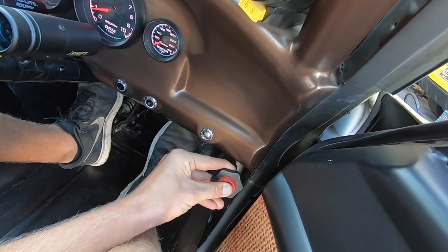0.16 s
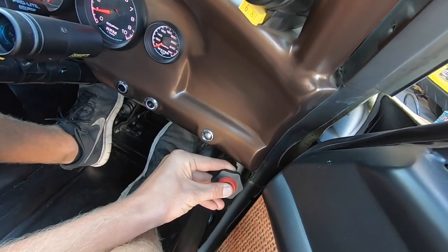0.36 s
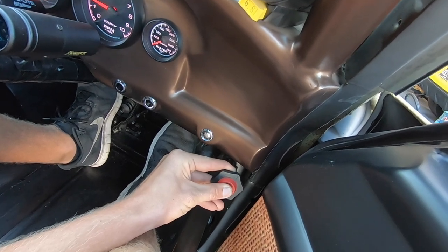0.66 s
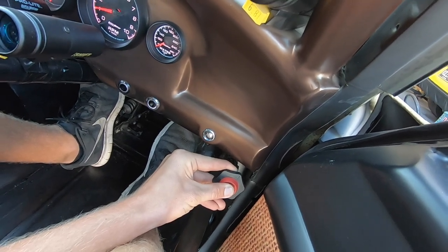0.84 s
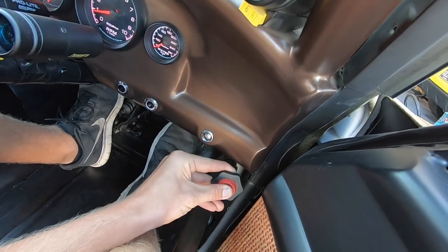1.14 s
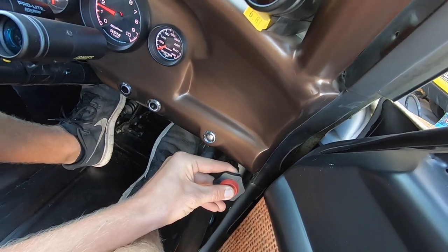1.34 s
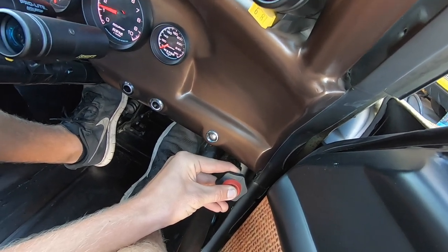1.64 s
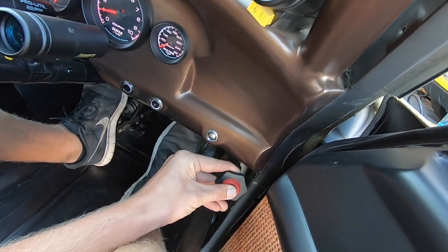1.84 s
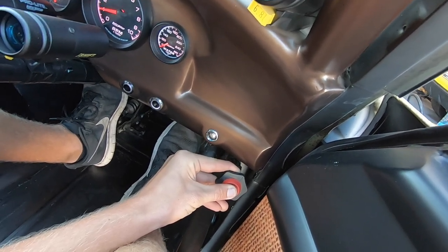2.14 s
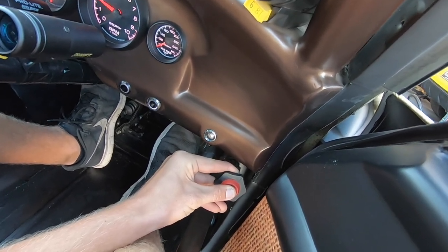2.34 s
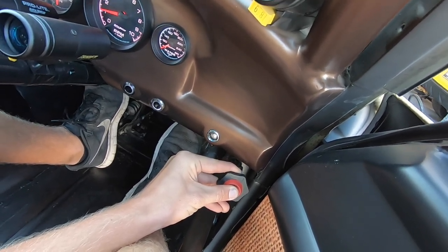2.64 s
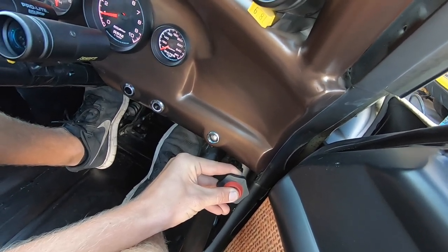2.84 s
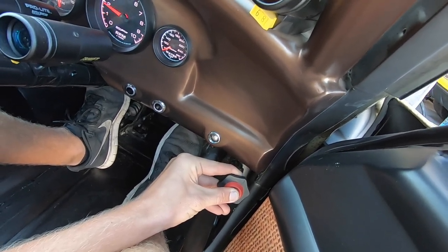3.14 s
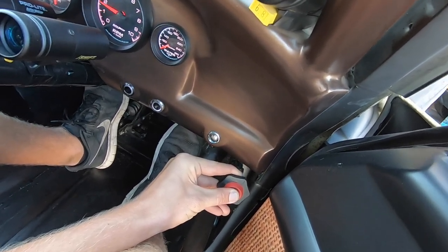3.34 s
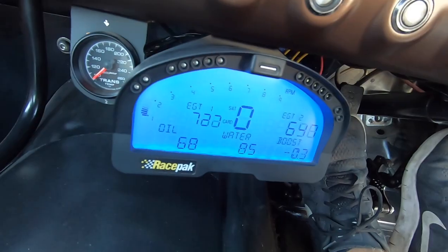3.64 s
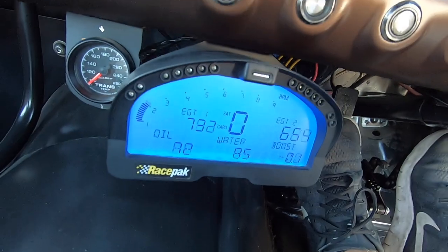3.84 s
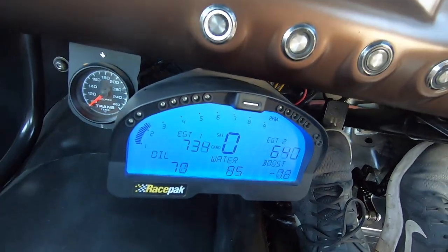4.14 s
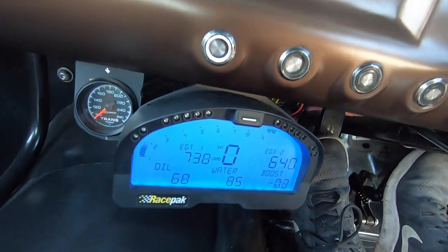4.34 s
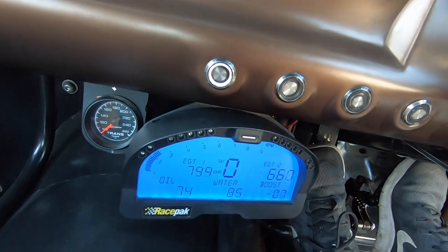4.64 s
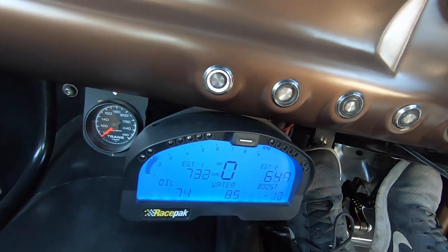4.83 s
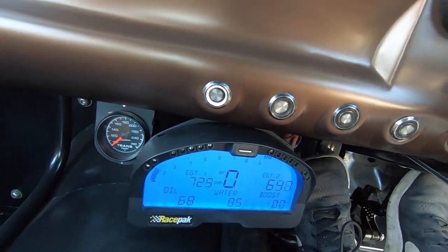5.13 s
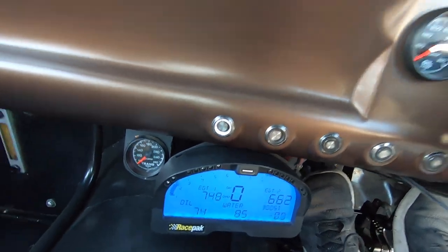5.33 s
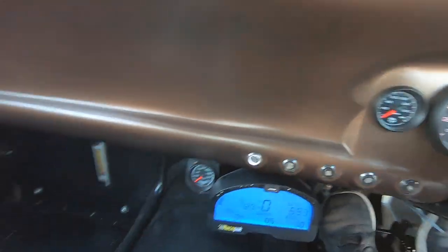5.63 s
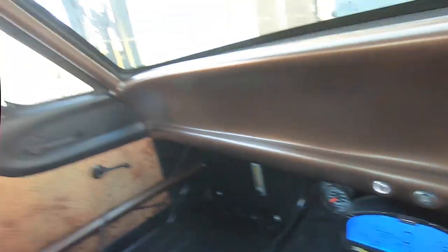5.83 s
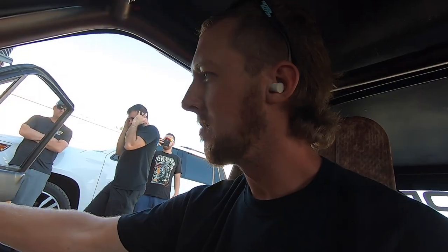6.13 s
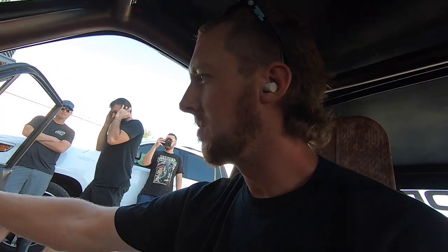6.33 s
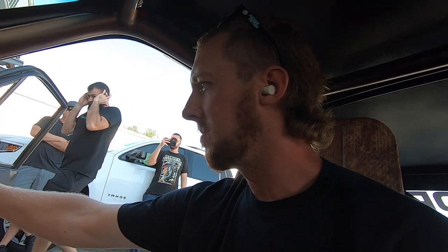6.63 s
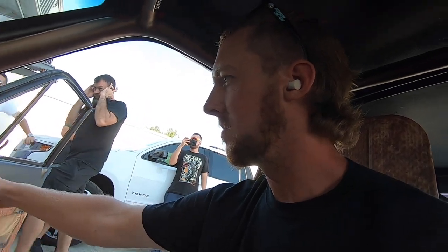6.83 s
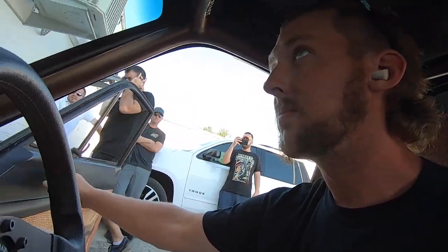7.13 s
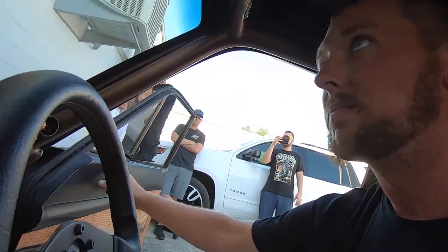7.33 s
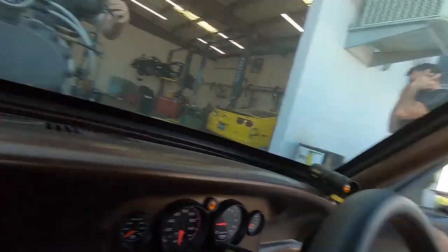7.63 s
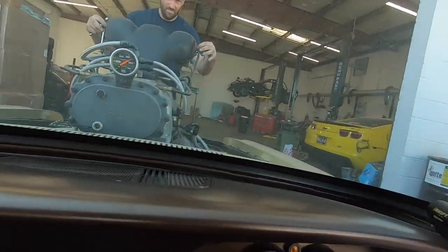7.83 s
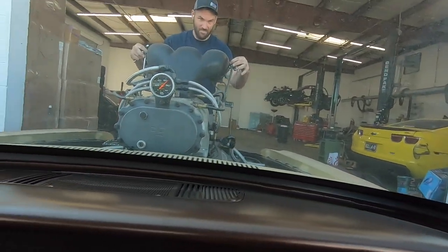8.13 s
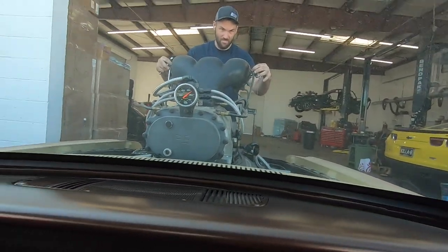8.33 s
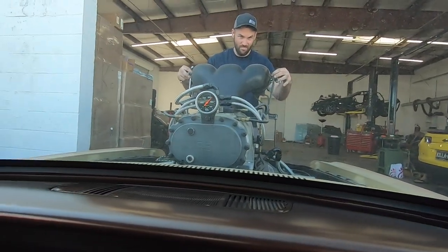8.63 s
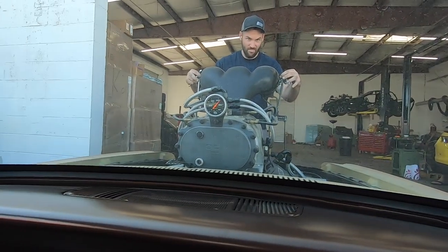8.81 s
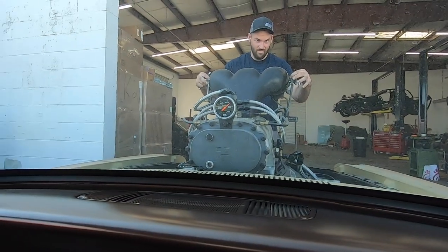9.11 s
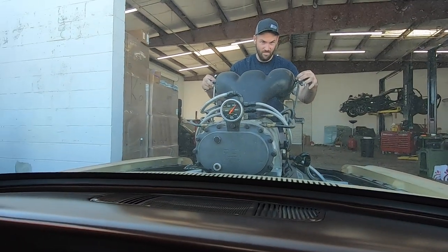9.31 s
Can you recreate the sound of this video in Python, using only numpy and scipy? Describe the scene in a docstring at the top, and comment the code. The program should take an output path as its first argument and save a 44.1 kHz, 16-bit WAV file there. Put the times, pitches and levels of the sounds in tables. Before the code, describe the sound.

Loud rhythmic hunting of a big racing engine, recorded in its hard, dry cabin. Each surge rises in about a fifth of a second, roars with raspy exhaust, and falls back into uneven firing and pops. Early surges are widely spaced and sweep far; later ones come faster and more evenly. Low boom and body rumble continue underneath as the listening place shifts from footwell to dashboard to window side.

```python
"""A big supercharged eight-cylinder engine hunts at idle, heard inside the bare cabin of its car.
Surges lift the firing note (sine and octave), bark from the pipes (pulsed resonances) and ring the cabin.
Now and then, in surges and between them, the bass drops out briefly; cylinders catch with pops and the
cabin booms near 90 Hz. Gas blasts are puffed noise bands with ringing metal; body rumble and valve hiss
are filtered noise. The listening place passes from footwell to dashboard to window."""
import sys
import numpy as np
from scipy import signal
from scipy.fft import rfft, irfft, next_fast_len
from scipy.io import wavfile
from scipy.ndimage import uniform_filter1d

SR = 44100
rng = np.random.default_rng(int(sys.argv[2]) if len(sys.argv) > 2 else 0)


def wav_out(sig):
    """Save sig, one row per channel (or a flat mono array), as 16-bit PCM at SR to the path in sys.argv[1]."""
    wavfile.write(sys.argv[1], SR, np.round(np.clip(np.atleast_2d(sig).T, -1, 1) * 32767).astype(np.int16))


N = 417627
STEP = 64   # samples between control values
BOOM_HZ, BOOM_WIDTH_HZ = 91.15, 8.65   # lowest cabin mode


def from_db(db):
    """Amplitude factor from dB."""
    return 10 ** (np.asarray(db) / 20)


def rms_one(x):
    """Scales the whole array to rms 1."""
    return x / np.sqrt(np.mean(x ** 2) + 1e-20)


def at_hz(points, hz):
    """Second column read off at hz, on a log frequency axis."""
    points_hz, values = np.transpose(points)
    return np.interp(np.log(hz), np.log(np.maximum(points_hz, 1)), values)


def smooth(x, hz):
    """One-pole low-pass; hz holds for signals at SR."""
    r = np.exp(-2 * np.pi * hz / SR)
    return signal.lfilter([1 - r], [1, -r], x)


def band_pass(x, order, low_hz, high_hz):
    """Butterworth band-pass."""
    return signal.sosfilt(signal.butter(order, [low_hz, high_hz], "band", fs=SR, output="sos"), x)


def resonance(x, hz, width_hz):
    """Two-pole peak with gain 1 on top."""
    r = np.exp(-np.pi * width_hz / SR)
    poles = [1, -2 * r * np.cos(2 * np.pi * hz / SR), r * r]
    return signal.lfilter([(1 - r * r) / 2, 0, (r * r - 1) / 2], poles, x)


def double_resonance(x, hz, width_hz):
    """A peak followed by one twice as wide."""
    return resonance(resonance(x, hz, width_hz), hz, 2 * width_hz)


def evened(x, window_s, share):
    """Divides out a share of the slow level, leaving rms 1."""
    power = uniform_filter1d(x ** 2, int(window_s * SR), axis=-1) + 1e-3 * np.mean(x ** 2)
    return rms_one(x / power ** (np.clip(share, 0, 1) / 2))


def control_times():
    """Times of the control values, s."""
    return np.arange(0, N + STEP, STEP) / SR


def filled(values):
    """Control values drawn out to every sample."""
    return np.interp(np.arange(N) / STEP, np.arange(len(values)), values)


# listening place: t/s, place (0 footwell, 1 dashboard, 2 window)
PLACE = [(0, 0), (3.3, 0), (3.7, 1), (5.8, 1), (6.2, 2), (9.47, 2)]


def by_place(values):
    """Values for footwell, dashboard and window, blended as the listening place moves."""
    place = np.interp(control_times(), *np.transpose(PLACE))
    return filled(np.interp(place, np.arange(3), values))


# crank surges: start t/s, climb/s, low rate/(firings/s), top rate/(firings/s), bark on top/dB
SURGES = [(0.26, 0.19, 58.4, 143.5, 2), (1.15, 0.19, 59.2, 148, 3.5), (2.02, .21, 65.5, 141, 3.5),
          (2.92, 0.21, 58.5, 153.5, 3.5), (3.52, .22, 71.7, 128, 1.5), (4.19, 0.23, 78, 132, 2.5),
          (4.93, .2, 81.7, 110, 0.5), (5.6, 0.24, 81.7, 132, 1), (6.201, .25, 84, 123, 2.5),
          (6.831, .23, 86, 125, 2.5), (7.42, .26, 86, 126.7, 3.5), (8.06, .26, 89, 121.4, 2.5),
          (8.7, 0.23, 89, 121, 1.5), (9.301, .3, 88.7, 115, 4.5)]
# idle hunting: t/s, rate loss after a top/(firings/s per s), power of climb time share, climb note gain/dB
SAG = [(0, 205, 1.195, 9.5), (3, 201.6, 1.2, 6.5), (4.5, 223, 1.477, 2.5), (6.5, 170, 2.0, 6),
       (9.47, 158.7, 2.04, -1.5)]


def surging():
    """Firing rate climbs to each top and sags to the next low; note level shifts on the climb, pipes bark on top."""
    flywheel_s, bark_s = .05, .06   # moving average; bark half length to 1/e of its dB
    t = control_times()
    start, climb, low, high, bark_db = np.transpose(SURGES)
    sag_t, *sag_columns = np.transpose(SAG)
    sag, bend, climb_db = (np.interp(t, sag_t, column) for column in sag_columns)
    last, top = len(start) - 1, start + climb
    k = np.clip(np.searchsorted(start, t) - 1, 0, last)
    up = np.clip((t - start[k]) / climb[k], 0, 1)
    climbing = low[k] + (high[k] - low[k]) * up ** bend
    sagging = np.maximum(high[k] - sag * (t - top[k]), low[np.minimum(k + 1, last)])
    per_s = np.where(up < 1, climbing, sagging)
    climb_db = climb_db * (up > 0) * (up < 1)
    rounded = [uniform_filter1d(c, int(flywheel_s * SR / STEP)) for c in (per_s, climb_db)]
    bark_db = sum(db * np.exp(-((t - s) / bark_s) ** 2) for s, db in zip(top, bark_db))
    return [filled(c) for c in (*rounded, bark_db)]


# cylinder strength in firing order, before chance: relative level/dB
CYLINDER_DB = [-4.5, 0.5, -5, -1, -6, -4.5, -1, -7.5]


def firings(cycles, uneven_db, jitter):
    """One click per firing; strength by cylinder and chance, timing off by jitter (share of a firing)."""
    count = np.arange(1, 1200)
    chance = rng.standard_normal((len(count), 2))
    at = np.searchsorted(cycles, count + jitter * chance[:, 0])
    size = from_db(np.array(CYLINDER_DB)[count % 8] + uneven_db * chance[:, 1])
    clicks = np.full(N + 1, 1e-18)
    np.add.at(clicks, at, size)
    return clicks[:N]


# note before the lows are evened, loudest near 78 firings/s, weakest near 120: rate/(firings/s),
# relative level/dB
NOTE = [(55, -25), (66, -21), (78, -11), (90, -16.5), (105, -14), (120, -27.5), (150, -15)]


def note_level(per_s, load_db, climb_db):
    """Note level follows firing rate, a share of the gas load, and the climb; dB."""
    return at_hz(NOTE, per_s) + 0.19 * load_db + climb_db


def firing_note(cycles, clicks, note_db, growl_db):
    """Firing order swells with the strength of each cylinder; its octave comes out under load."""
    swell = smooth(smooth(clicks, 16.0), 16.0) / uniform_filter1d(clicks, SR // 5)
    lumps = rms_one(np.clip(swell, .4, 1.7)) ** 0.52
    phase = 2 * np.pi * cycles
    first = from_db(note_db) * np.sin(phase)
    octave = from_db(growl_db - 11.5) * np.sin(2 * phase)
    return np.sqrt(2) * lumps * (first + octave)


def boom(clicks, per_s, boom_db):
    """Firings and noise ring the lowest cabin mode; it yields as the firing note passes its pitch."""
    push = rms_one(clicks) + 1.15 * rng.standard_normal(N)
    ringing = double_resonance(push, BOOM_HZ, BOOM_WIDTH_HZ)
    free = 1 - 0.22 * np.exp(-((per_s - BOOM_HZ) / 9.6) ** 2)
    return from_db(boom_db) * free * evened(ringing, .045, share=0.82)


# bass before load and dips, strongest near the cabin pitch: rate/(firings/s), level/dB
BASS = [(58, -15.5), (75, -15), (90, -11.5), (105, -13), (120, -17), (150, -16.5)]


def bass(lows, per_s, load_db):
    """Evens note and boom together, then sets their level by rate, gas load and dips."""
    level_db = at_hz(BASS, per_s) + 0.036 * load_db
    lows = from_db(level_db) * dips() * evened(lows, .03, share=0.93)
    return lows * from_db([[-.15], [.15]])


# body shake: level/dB of the low band in footwell, at dashboard, at window
RUMBLE_DB = [-32.5, -36.5, -34.5]


def rumble():
    """Shaking body: noise below and above the boom, a trace of it unlike on the two sides."""
    below, above = rng.standard_normal((2, 2, N))
    noise = rms_one(band_pass(below, 2, 22, 70))
    noise += from_db(2.0) * rms_one(band_pass(above, 2, 105, 175))
    return from_db(by_place(RUMBLE_DB)) * (noise[0] + from_db(-16) * noise[1] * [[1], [-1]])


def growl_level(per_s, gas_load_db, bark_db):
    """Growl follows gas load, firing rate and bark, over an idle floor; dB."""
    growl_db = -24.5 + 0.64 * gas_load_db + 6 * np.log2(per_s / BOOM_HZ) + bark_db   # 6 dB/octave
    idle_db = -41.5
    return 10 * np.log10(from_db(2 * growl_db) + from_db(2 * idle_db))


def cabin(x, t60_s):
    """Short feedback delays between hard panels, other ones on each side; rms 1."""
    size = next_fast_len(N + SR)
    w, spectrum = 2 * np.pi * np.arange(size // 2 + 1) / size, rfft(x, size)
    sides = []
    for lags in rng.uniform(.003, .016, (2, 6)) * SR:
        turns = [from_db(-60 * lag / SR / t60_s) * np.exp(-1j * w * lag) for lag in lags]
        sides.append(sum(z / (1 - z) * (-1) ** k for k, z in enumerate(turns)))
    return rms_one(irfft(spectrum * np.array(sides), size)[:, :N])


# pipe and cabin resonances: f/Hz, width of narrower peak/Hz, relative level/dB in footwell, at dashboard,
# at window
PIPES = [(37.4, 13, -17.5, -16, -6), (125, 20.4, 5.5, -3.5, 0.5), (156, 15.5, 4, 2.5, 6),
         (214.9, 20.4, -2, 2.5, 6), (245.3, 37.6, 1, -6.5, 0.5), (322, 35, -7.5, -7.5, -7),
         (374.7, 18.6, -8.5, -6.5, -13.5), (414.6, 32.6, -10, -12, -4.5), (483.5, 45, -15, -10, -8),
         (596, 55, -11.5, -14.5, -14), (781, 156, -9.5, -15.5, -12.5)]


def growl(clicks, growl_db):
    """Pressure pulses and turbulent wake ring the pipes; only the upper part spreads across the cabin."""
    wake = smooth(clicks, 32.0) * rng.standard_normal(N)
    push = rms_one(clicks) + 1.83 * rms_one(wake)
    rings = 0
    for k, (hz, width_hz, *db) in enumerate(PIPES):
        rings = rings + from_db(by_place(db)) * (-1) ** k * rms_one(double_resonance(push, hz, width_hz))
    rings = from_db(growl_db) * evened(rings, .1, share=0.83)
    upper = signal.sosfilt(signal.butter(7, 430, "high", fs=SR, output="sos"), rings)
    spread = from_db(-17) * np.std(rings) * cabin(upper, t60_s=.2)
    return rings + spread * from_db([[-1.5], [1.5]])


# headers and sheet metal: f/Hz, width/Hz, relative level/dB before chance
METAL = [(704, 55, 5), (768, 64, 3), (911, 43, 2.5), (1119, 36, -1), (1402, 280, 0), (1627, 33, -5.5),
         (1969, 50, -5.5), (2384, 130, -4.5), (2586, 80, -9.5), (3000, 140, -5.5), (3250, 90, -8),
         (3846, 29, -14.5), (6750, 92, -34), (7510, 40, -9)]


def rasp(clicks):
    """Each firing shakes every metal mode with a strength of its own; rms 1 overall."""
    at, out = np.flatnonzero(clicks > 1e-9), np.zeros((2, N))
    for hz, width_hz, db in METAL:
        blows = np.full(N, 1e-18)
        blows[at] = clicks[at] * from_db(5.4 * rng.standard_normal(1200)[:len(at)])
        shake = smooth(blows, 11.2) * rng.standard_normal(N)
        lean_db = 5.1 * rng.standard_normal() * np.array([[.5], [-.5]])
        out += from_db(db + lean_db) * rms_one(resonance(shake, hz, width_hz))
    return evened(out, 0.048, share=0.29)


# exhaust jet colour: f/Hz, relative level per Hz/dB in footwell, at dashboard, at window
JET = [(400, 0.5, -9.5, -5), (560, -10.5, -3, -6), (744, -4.5, -6.5, -15.5), (944, -10.5, -4, -6.5),
       (1590, -15, -7, -10), (2410, -12.5, -13.5, -16), (3100, -16.5, -16.5, -20), (4020, -22, -21.5, -23),
       (4890, -24.5, -24, -25), (7580, -15.5, -15.5, -17.5), (10050, -31, -27.5, -28.5),
       (11300, -47, -48, -46), (13000, -54, -58, -52), (15000, -57, -53.5, -57)]
# left-right likeness of the jet: f/Hz, correlation
LIKENESS = [(60, 1.0), (140, 0.96), (340, 1), (790, -0.046), (1880, 0.28), (4440, 0.6), (10500, -0.51)]
# left over right of the jet: f/Hz, level/dB
LEFT_OVER_RIGHT = [(60, 0.0), (170, 10), (470, -4), (1330, -1), (3730, -1), (10500, -1.5)]


def jet(clicks, jet_db, pop_power):
    """Gas tearing out of the pipes: third-octave noise puffed by every firing, brighter when weak."""
    puffs = rms_one(16.0 + rms_one(smooth(smooth(clicks, 36.0), 300.0)))
    level = np.sqrt((from_db(jet_db) * puffs) ** 2 + pop_power)
    effort_db = jet_db - np.mean(jet_db)
    out, edges_hz = 0, 450 * 2 ** np.arange(0, 5.4, 1 / 3)
    white = rng.standard_normal((2, 2, N))
    for k, (low_hz, high_hz) in enumerate(zip(edges_hz, edges_hz[1:])):
        mid, side = band_pass(white[k % 2], 3, low_hz, high_hz)
        hz = np.sqrt(low_hz * high_hz)
        alike = np.clip(at_hz(LIKENESS, hz), -1, 1)
        # one value per 64 samples, so the low-pass acts at 420 / 64 Hz
        flicker = np.repeat(rms_one(smooth(rng.standard_normal(N // 64 + 1), 420.0)), 64)[:N]
        tilt_db = -.05 * effort_db * np.log2(hz / 3000)
        colour_db = by_place([at_hz(np.array(JET)[:, [0, place]], hz) for place in (1, 2, 3)])
        lean = from_db(at_hz(LEFT_OVER_RIGHT, hz) * np.array([[.5], [-.5]]))
        band = np.sqrt(1 + alike) * mid + np.sqrt(1 - alike) * side * [[1], [-1]]
        out = out + from_db(colour_db + tilt_db + 2.35 * flicker) * lean * band
    metal = from_db(by_place([-1.5, -5, -5.5])) * rasp(clicks)
    return level * (rms_one(out) + metal)


def valve_gear():
    """Steady mechanical hiss from valves and blower that stays when the jet drops."""
    return from_db(-53.5) * rms_one(band_pass(rng.standard_normal((2, N)), 2, 900, 3400))


# cylinders that catch with a pop: t/s, relative level/dB, decay t60/s
POPS = [(0.035, -22, 0.11), (0.1188, -26.5, 0.24), (0.142, -20.5, 0.21), (0.2475, -22, 0.4),
        (0.8804, -27, 0.19), (0.944, -27, 0.31), (1.0796, -20.5, 0.066), (1.2206, -20.5, 0.17),
        (1.73, -25, 0.25), (1.805, -27, 0.34), (1.902, -22, 0.21), (1.9774, -20, 0.084), (2.016, -18, 0.2),
        (2.3223, -25, 0.17), (2.503, -33, 0.15), (2.566, -26.5, 0.19), (2.647, -23.5, 0.19),
        (2.7586, -23.5, 0.23), (2.842, -26, 0.57), (2.9374, -23, 0.19), (3.1515, -31.5, 0.14),
        (3.449, -41, 0.092), (3.519, -29, 0.15), (3.593, -27.5, 0.24), (3.883, -28, 0.16),
        (3.94, -25.5, 0.19), (4.005, -30, 0.24), (4.135, -27, 0.084), (4.679, -39, 0.12),
        (4.78, -26.5, 0.092), (5.3384, -28, 0.19), (5.385, -31.5, 0.2), (5.509, -29, 0.21),
        (5.601, -29, 0.21), (5.851, -23.5, 0.087), (6.0486, -26.5, 0.16), (6.125, -26, 0.094),
        (6.2454, -23.5, 0.2), (6.6996, -26, 0.17), (6.815, -27, 0.13), (6.8997, -20.5, 0.14),
        (6.975, -25, 0.14), (7.2, -26.5, 0.33), (7.269, -24.5, 0.076), (7.333, -31.5, 0.13),
        (7.372, -24.5, 0.13), (7.8186, -25, 0.09), (7.8705, -25, 0.095), (7.925, -26, 0.45),
        (8.105, -28.5, 0.56), (8.255, -22.5, 0.11), (8.466, -33, 0.21), (8.5197, -23.5, 0.29),
        (8.5804, -24, 0.11), (8.64, -31, 0.19), (8.706, -25.5, 0.15), (8.7505, -30.5, 0.23),
        (9.012, -24, 0.32), (9.072, -28.5, 0.37), (9.131, -23, 0.17), (9.25, -28, 0.32)]


def pops():
    """Each pop swells in a few ms, then falls ever faster as the gas escapes; power envelope."""
    out = np.zeros(N)
    for s, db, t60_s in POPS:
        at = round(s * SR)
        t = np.arange(min(N - at, SR // 4)) / SR
        fall_db = 60 * (t / max(t60_s, .03)) ** 1.4
        swell = 1 - np.exp(-t * SR / 170)   # 170 samples
        out[at:at + len(t)] += (from_db(db - 6 - fall_db) * swell) ** 2
    return out


# brief bass dips and a few lifts: t/s, depth/dB (negative lifts), length between 1/e points of the depth/s
BASS_DIPS = [(0.072, 10, 0.044), (0.226, 8, 0.034), (0.463, 1, 0.025), (0.565, 3, 0.12),
             (0.699, 12.5, 0.036), (1.049, 8, 0.019), (1.41, -1.5, 0.019), (1.61, 8.9, 0.045),
             (1.691, 17.5, 0.038), (1.869, 6, 0.0079), (1.977, 5, 0.024), (2.314, 2.5, 0.02),
             (2.373, 6, 0.029), (2.581, 30, 0.023), (2.784, 9.3, 0.019), (2.897, 9, 0.037),
             (3.133, 22, 0.011), (3.254, -1, 0.035), (3.424, 14, 0.031), (3.534, 11, 0.069),
             (3.783, 6, 0.013), (3.997, 10.5, 0.024), (4.198, 22, 0.026), (4.548, 9, 0.056),
             (4.697, 20, 0.019), (4.98, 4, 0.032), (5.04, -1, 0.015), (5.194, 4, 0.043), (5.59, 6.5, 0.069),
             (5.928, 22, 0.045), (6.132, 14, 0.0096), (6.239, 9, 0.046), (6.428, 23, 0.01),
             (6.824, 7.5, 0.018), (7.142, 14, 0.025), (7.371, 17, 0.023), (7.459, 10, 0.034),
             (7.737, 4, 0.048), (8.099, 9, 0.033), (8.235, 13, 0.03), (8.454, 22, 0.02), (8.66, 12, 0.043),
             (8.88, 8.5, 0.016), (8.938, 3, 0.012), (9.115, 4.5, 0.13), (9.245, 13.5, 0.019),
             (9.35, 25, 0.036)]


def dips():
    """Gain with a short rounded dip, or now and then a slight lift, of the bass."""
    t = control_times()
    depth_db = sum(db * np.exp(-(2 * (t - s) / length) ** 2) for s, db, length in BASS_DIPS)
    return from_db(-filled(depth_db))


# gas blasts from the pipe ends, one a surge: t/s, build/s, hold/s, start level/dB, full level/dB
BLASTS = [(0.258, 0.075, 0.16, -30.5, -23.5), (1.081, .15, .14, -34.5, -24.5), (1.935, 0.16, .14, -47, -24),
          (2.833, 0.16, 0.17, -48.5, -24.5), (3.468, 0.19, 0.095, -45, -26.5),
          (4.124, .2, .14, -45.5, -27.5), (4.69, .35, 0.11, -48.5, -26), (5.586, .18, 0.11, -41, -26),
          (6.038, 0.3, .27, -44, -26.5), (6.7, 0.32, 0.12, -38, -27.5), (7.292, 0.27, 0.18, -43, -26.5),
          (7.802, 0.44, .12, -44, -28), (8.62, 0.22, .11, -45, -26), (9.264, 0.25, .1, -41.5, -24.5)]


def blasts():
    """Each blast builds, droops slowly until the cut, then falls fast to the idle flow; dB."""
    droop_db_per_s, fall_db_per_s, idle_jet_db = 29.5, 163.5, -50.5
    t, power = control_times(), from_db(2 * idle_jet_db)
    for start, build, hold, start_db, full_db in BLASTS:
        full, cut = start + build, start + build + hold
        cut_db = full_db - droop_db_per_s * hold
        levels_db = [-99, start_db, full_db, cut_db, cut_db - fall_db_per_s]
        db = np.interp(t, [start - .01, start, full, cut, cut + 1], levels_db)
        power = power + from_db(2 * db)
    return filled(10 * np.log10(power))


def scene():
    """Surges and gas load drive the engine layers; rumble and valve hiss run on their own."""
    (per_s, climb_db, bark_db), jet_db, pop_power = surging(), blasts(), pops()
    gas_db = 10 * np.log10(smooth(from_db(2 * jet_db) + pop_power, 6.7) + 1e-6)   # growl lags at 6.7 Hz
    load_db = gas_db - np.mean(gas_db)
    growl_db = growl_level(per_s, load_db, bark_db)
    note_db = note_level(per_s, load_db, climb_db)
    cycles = np.cumsum(per_s) / SR
    clicks = firings(cycles, uneven_db=1.5, jitter=.06)
    lows = firing_note(cycles, clicks, note_db, growl_db)
    lows = lows + boom(clicks, per_s, by_place([-10, -12, -12]))
    engine = bass(lows, per_s, load_db) + growl(clicks, growl_db) + jet(clicks, jet_db, pop_power)
    return engine + rumble() + valve_gear()


def gain_control(x, threshold_db, share):
    """Fast gain control: a share of the level above the threshold is taken back."""
    level_db = 10 * np.log10(smooth(smooth(np.mean(x ** 2, axis=0), 33.0), 33.0) + 1e-9)
    return x * from_db(-np.clip(share, 0, 1) * np.maximum(level_db - threshold_db, 0))


def band_limit(x):
    """A steep low-pass at the top of the band."""
    return signal.sosfilt(signal.butter(12, 15500, fs=SR, output="sos"), x)


def record(dry):
    """Cuts both ends of the spectrum, controls the gain and rounds the peaks."""
    dull = band_pass(dry, 6, 15, 14700)
    held = gain_control(dull, threshold_db=-12.5, share=0.36)
    mix = 1.222 * np.tanh(held / 1.048)
    return band_limit(mix)


dry = scene()
out = record(dry)
wav_out(out)
```